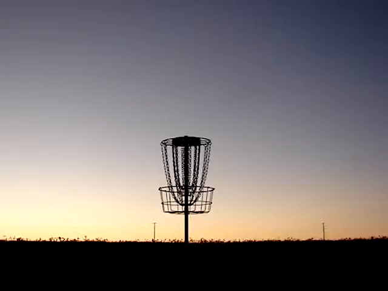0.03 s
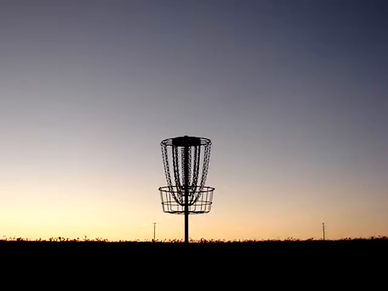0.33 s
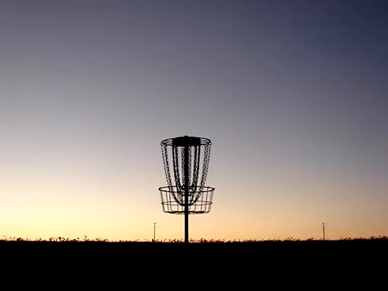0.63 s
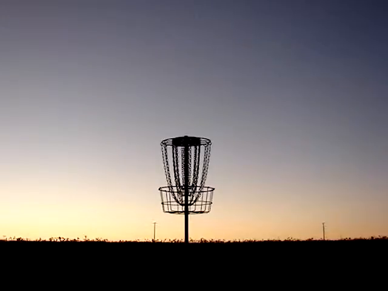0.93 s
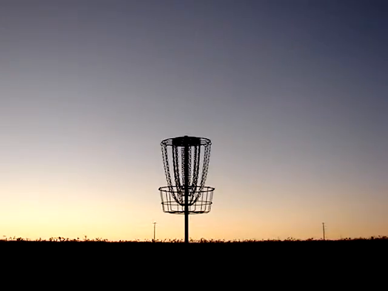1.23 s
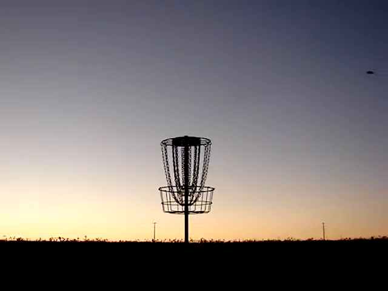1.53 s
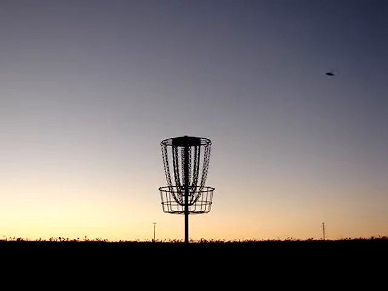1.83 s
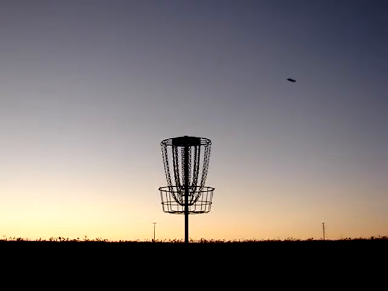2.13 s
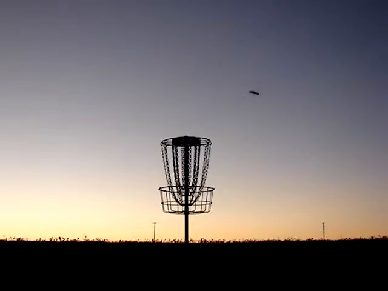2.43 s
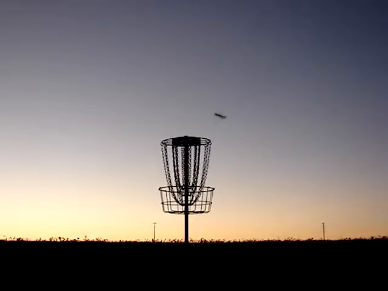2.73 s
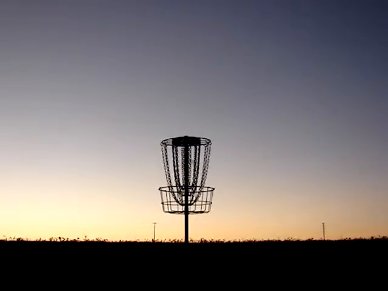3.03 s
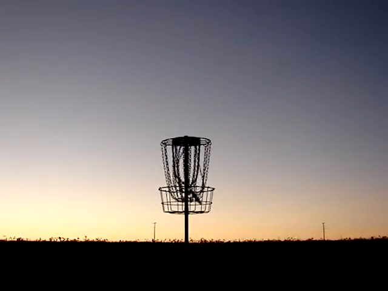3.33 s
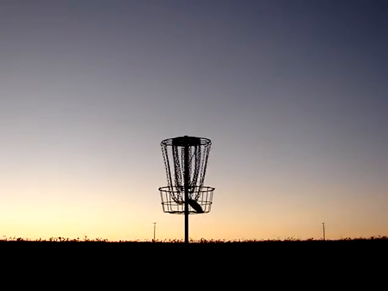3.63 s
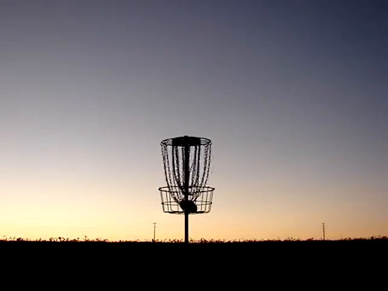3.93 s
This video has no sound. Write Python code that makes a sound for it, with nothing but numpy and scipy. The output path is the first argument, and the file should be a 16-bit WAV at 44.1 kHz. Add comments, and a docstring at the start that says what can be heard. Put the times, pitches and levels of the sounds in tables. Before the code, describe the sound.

Metal chains clash and jingle near the microphone when a flying disc cracks into them and knocks down into a wire basket. Before the hit, the open field is quiet, with distant traffic, soft scuffs and two faint peeps.

```python
"""Far traffic hums over an open field at dusk, with a hiss of air, soft scuffs and two bird peeps.
Then a plastic disc cracks against the hanging chains of a steel basket. The impact excites the modes
of disc, pole and wire tray; the links collide in bursts and ring in their bending modes while the disc
drops into the tray. A limiter ducks the background at the hit."""
import sys
import numpy as np
from scipy import signal
from scipy.fft import rfft, irfft
from scipy.io import wavfile
from scipy.ndimage import uniform_filter1d, minimum_filter1d

SR = 44100
rng = np.random.default_rng(int(sys.argv[2]) if len(sys.argv) > 2 else 0)


def bounce(signal):
    """Save signal as a 16-bit WAV file at the path given by the first command-line argument."""
    frames = np.transpose(np.atleast_2d(signal))
    limited = np.clip(frames, -1, 1)
    pcm = np.round(limited * 32767).astype(np.int16)
    wavfile.write(sys.argv[1], SR, pcm)


N = 176400
TIME = np.arange(N) / SR

# contacts of the disc: start_s, plastic_db, tray_db
DISC_CONTACTS = [(3.2051, 3, -49), (3.2099, 2, -47), (3.2124, 6, -53), (3.2179, -1.5, -55),
                 (3.2208, -2.5, -53), (3.2272, -20.5, -51), (3.2383, -10, -48), (3.2491, -15, -52),
                 (3.2518, -24, -50), (3.3619, -17, -43), (3.494, -23, -35.5), (3.616, -15, -37),
                 (3.659, -27, -49), (3.719, -21, -38.5), (3.737, -28, -43), (3.9085, -17.5, -41.5),
                 (3.921, -15, -51), (3.975, -16, -58)]
# bursts of colliding links: start_s, length_s, clatter_db, ring_db, shimmer_db, first_touch_db
CHAIN_CLASHES = [(3.235, 0.025, -12.5, -11.5, -10.5, 5), (3.278, .05, -27.5, -12.5, -23, -11),
                 (3.397, 0.014, -22.5, -19.5, -30, -20), (3.491, 0.029, -20.5, -21, -22.5, -18),
                 (3.505, 0.023, -21, -33, -24, -21), (3.658, 0.01, -18, -19.5, -19.5, 2),
                 (3.718, 0.036, -21, -23, -20, -6), (3.9198, 0.0089, -23, -23.5, -14.5, 7.5),
                 (3.928, 0.025, -30.5, -27.5, -35, -20), (3.972, .03, -33, -22, -33, -36)]


def from_db(db):
    """Decibels to amplitude ratio."""
    return 10 ** (np.asarray(db) / 20)


def rms_one(x):
    """Normalisation to an rms of 1."""
    return x / np.sqrt(np.mean(x ** 2) + 1e-20)


def decay(t, t60):
    """Exponential damping: 1 until t = 0, then 60 dB down every t60."""
    return np.exp(-np.log(1000) * np.maximum(t, 0) / t60)


def noise(spectrum):
    """Spectral shaping of white noise, at an rms of 1."""
    hz, db = np.transpose(spectrum)
    bins_hz = np.maximum(np.arange(N // 2 + 1) * SR / N, 1)
    gain = from_db(np.interp(np.log(bins_hz), np.log(hz), db))
    return rms_one(irfft(rfft(rng.standard_normal(N)) * gain, N))


def drift(rate_hz):
    """Random modulation of rms 1, interpolated between rate_hz points a second."""
    return rms_one(np.interp(TIME * rate_hz, np.arange(N), rng.standard_normal(N)))


def swell(start, length, skew):
    """Half-sine envelope; a skew under 1 makes it peak early."""
    return np.sin(np.pi * np.clip((TIME - start) / length, 0, 1) ** skew).clip(0)


def strike(times, levels_db):
    """Brief contacts idealised as impulses."""
    clicks = np.zeros(N)
    clicks[np.minimum(np.atleast_1d(times) * SR, N - 1).astype(int)] = from_db(levels_db)
    return clicks


def ring(clicks, hz, t60):
    """Damped resonator: a unit impulse starts a decaying sine of amplitude 1."""
    radius, angle = decay(1 / SR, t60), 2 * np.pi * hz / SR
    return signal.lfilter([0, np.sin(angle)], [1, -2 * radius * np.cos(angle), radius ** 2], clicks + 1e-18)


def dense_ring(clicks, spectrum, t60):
    """High modal overlap: the impulse response is decaying noise of unit energy."""
    response = (noise(spectrum) * decay(TIME, t60))[:SR // 4]
    return signal.oaconvolve(clicks, response / np.linalg.norm(response))[:N]


def struck_modes(times, levels_db, modes):
    """Modal superposition: each blow excites every mode with a random phase and a scattered level."""
    out = 0
    for hz, mode_db, t60 in modes:
        onsets = times + rng.random(len(times)) / hz
        clicks = strike(onsets, levels_db + mode_db + rng.normal(0, 1.3, len(times)))
        out += ring(clicks, hz, t60)
    return out


def traffic():
    """Incoherent addition: far vehicles merge into a dull noise of slowly varying level."""
    # loudness contour: time_s, level_db
    contour = [(0, -50), (1.0, -50.5), (1.5, -49.5), (2.0, -52.5), (2.6, -52.5), (3.2, -53.5), (4, -48.5)]
    # traffic hum: frequency_hz, density_db
    spectrum = [(25, -24.5), (80, -7), (200, -8.5), (380, -4), (580, -7.5), (720, -0.5), (900, 2),
                (1300, -7), (2400, -19), (4000, -34.5)]
    level_db = np.interp(TIME, *np.transpose(contour)) + 0.2 * drift(9.4)
    return from_db(level_db) * noise(spectrum)


def air():
    """Stationary broadband noise: the even hiss of open air."""
    # hiss: frequency_hz, density_db
    spectrum = [(100, -4), (1000, -0.5), (1900, 2.5), (2350, 1), (2700, -6.5), (3100, -6), (3550, 0),
                (3850, -7), (4500, -8.5), (7300, -11), (10000, -16.5)]
    return from_db(-54) * noise(spectrum)


def scuffs():
    """Friction noise in soft swells, roughened by amplitude modulation."""
    # scuffs: start_s, length_s, level_db
    strokes = [(0.122, 0.18, -48), (1.153, .16, -51), (2.738, 0.16, -51)]
    # rubbing noise: frequency_hz, density_db
    spectrum = [(200, 1.5), (900, -3.5), (1800, -1.5), (2800, -1), (4200, -6), (5200, -11.5), (7200, -11),
                (9500, -28.5)]
    envelope = sum(from_db(db) * swell(start, length, skew=.7) for start, length, db in strokes)
    return envelope * noise(spectrum) * from_db(0.97 * drift(120))


def bird():
    """Frequency and amplitude modulation of a pure tone: thin peeps scoop up to pitch and waver."""
    # calls: start_s, length_s, level_db
    peeps = [(1.123, 0.22, -56), (2.631, 0.18, -53.5)]
    pitch_hz, scoop_hz, scoop_s, waver_hz = 4090, 244.3, 0.0484, 75.6
    out = 0
    for start, length, db in peeps:
        scoop = scoop_hz * np.exp(-np.maximum(TIME - start, 0) / scoop_s)
        hz = pitch_hz - scoop + waver_hz * drift(250)
        envelope = from_db(db + 3.1 * drift(70)) * swell(start, length, skew=0.84) ** .5
        out += envelope * np.sin(2 * np.pi * np.cumsum(hz) / SR)
    return out


def disc_impacts():
    """Impulse excitation: each contact gives a band-limited crack and a short, dense plastic ring."""
    # struck plastic: frequency_hz, density_db
    spectrum = [(100, -16), (550, -16.5), (1100, -8), (1700, 4), (3600, 6), (5000, 3), (6500, -4),
                (8700, -7), (9400, -25), (10500, -21)]
    times, levels_db, _ = np.transpose(DISC_CONTACTS)
    crack_band = signal.butter(2, [1090, 4100], "band", fs=SR, output="sos")
    crack = signal.sosfilt(crack_band, strike(times, levels_db))
    slap = sum(dense_ring(strike(t, db), spectrum, t60=0.063) for t, db in zip(times, levels_db))
    return from_db(13.5) * crack + from_db(9.5) * slap


def pole_shudder():
    """Free vibration: the first blow leaves the pole shuddering at low frequencies."""
    # jolted pole: frequency_hz, density_db
    spectrum = [(20, 5.5), (45, -0.5), (75, 3.5), (120, -7.5), (170, -10), (300, -19), (700, -30)]
    start, db, _ = DISC_CONTACTS[0]
    return from_db(1) * dense_ring(strike(start, db), spectrum, t60=.36)


def disc_tones():
    """Heavy damping: the disc's distinct modes die soon after each contact."""
    # plastic disc: pitch_hz, level_db, t60_s
    modes = [(270, -36.5, 0.058), (1326, -27, 0.09), (1657, -22.5, 0.044), (1836, -34, 0.071),
             (2550, -26, 0.079), (2620, -33, 0.15), (3070, -26, 0.077), (3540, -36, 0.082),
             (4470, -36, .07), (5310, -32, .08), (6060, -36, .08)]
    times, plastic_db, _ = np.transpose(DISC_CONTACTS)
    return struck_modes(times, plastic_db, modes)


def wire_tray():
    """Light damping: each contact of the disc shakes the steel tray, whose modes ring on."""
    # wire tray: pitch_hz, level_db, t60_s
    modes = [(255, -19.5, 1), (280, -24, .6), (420, -18.5, 0.78), (880, -21, 0.44), (1365, -11.5, 0.42),
             (1994, -7, 0.66), (2120, -4, 0.26), (2146, -5.5, 0.9), (2227, -6, .2)]
    times, _, tray_db = np.transpose(DISC_CONTACTS)
    return struck_modes(times, tray_db, modes)


def agitation(levels_db):
    """How hard the links meet: each clash holds, drops and settles, and the clashes add in power."""
    settle_db, settle_t60_s = -7.5, 0.41
    power = 0
    for (start, length, *_), db in zip(CHAIN_CLASHES, levels_db):
        after = TIME - start - length
        envelope = np.where(after < 0, 1, from_db(settle_db) * decay(after, settle_t60_s))
        power += (from_db(db) * (TIME >= start) * envelope) ** 2
    return np.sqrt(power)


def link_tones(modes, levels_db):
    """Energy balance: modes gain energy in each clash and lose it to damping; jostling shifts their phase."""
    spread_db, phase_kick_rad = 1.5, 0.0287
    out, jostle = 0, agitation(np.zeros(len(CHAIN_CLASHES)))
    for hz, mode_db, t60 in modes:
        feed = 0
        for (start, length, *_), db in zip(CHAIN_CLASHES, levels_db):
            during = (TIME >= start) & (TIME < start + length)
            feed += from_db(db + mode_db + rng.normal(0, spread_db)) ** 2 * during / (length * SR)
        energy = signal.lfilter([1], [1, -decay(2 / SR, t60)], feed)
        phase = np.cumsum(phase_kick_rad * jostle * rng.standard_normal(N))
        out += np.sqrt(energy) * np.sin(2 * np.pi * (hz * TIME + rng.random()) + phase)
    return out


def chains(links=60, tick_groups=10, touches_per_s=1000, spread_db=5):
    """Collisions as a Poisson process: each touch ticks and rings one link, beside the clear bending tones."""
    # clearest first and second bending modes of the links: pitch_hz, level_db, t60_s
    first_bending = [(3309, -3.5, .75), (3349, 2, .65), (3443, -8, .4), (3619, -14, .6), (3902, -9, .5),
                     (4371, -18, .3), (4770, -22, .3)]
    second_bending = [(9431, -2, .25), (9536, -5, .25), (9658, -10, .2), (9844, -13, .2)]
    # tick of link against link: frequency_hz, density_db
    tick_spectrum = [(150, -30.5), (600, -34), (1300, -7.5), (2200, 1.5), (2700, -1.5), (3200, 8.5),
                     (4000, 15), (4800, 3), (6300, -11), (7300, -2), (8500, -3), (10000, -8)]
    # ring, clatter and shimmer modes of the other links: centre_hz, scatter_hz, t60_s, level_db
    link_modes = [(3210, 300, 0.54, -14.5), (4990, 1200, 0.082, -6.5), (9427, 247, 0.099, -5.5)]
    tick_t60_s = 0.039
    starts, _, clatter_db, ring_db, shimmer_db, first_touch_db = np.transpose(CHAIN_CLASHES)
    sizes = from_db(spread_db * np.clip(rng.standard_normal(N), -2, 2)) * rng.choice([-1, 1], N)
    touches = rms_one(sizes * (rng.random(N) < touches_per_s / SR))
    struck_link = rng.integers(0, links, N)
    clatter = agitation(clatter_db)
    out = link_tones(first_bending, ring_db) + link_tones(second_bending, shimmer_db)
    out += dense_ring(strike(starts, first_touch_db), tick_spectrum, tick_t60_s)
    for group in range(tick_groups):
        ticks = touches * clatter * (struck_link % tick_groups == group)
        out += from_db(-4) * dense_ring(ticks, tick_spectrum, tick_t60_s)
    forces = agitation(ring_db), clatter, agitation(shimmer_db)
    for force, (hz, scatter_hz, t60, db) in zip(forces, link_modes):
        unit_energy_gain = np.sqrt(2 * (1 - decay(2 / SR, t60)))
        blows = touches * force * from_db(db) * unit_energy_gain
        for link, offset in enumerate(rng.standard_normal(links)):
            out += ring(blows * (struck_link == link), hz + offset * scatter_hz, t60)
    return out


def singing_link():
    """Single-mode resonance: a squarely struck link swells and sings until its neighbours damp it."""
    start_s, pitch_hz, rise_s, hold_s = 3.249, 3351, .036, .024
    t = TIME - start_s
    envelope = np.clip(t / rise_s, 0, 1) * decay(t - rise_s - hold_s, t60=.16)
    return from_db(0.5) * envelope * np.sin(2 * np.pi * pitch_hz * t)


def scene():
    """Superposition of all sources at one point near the basket."""
    background = traffic() + scuffs() + air() + bird()
    impacts = disc_impacts() + pole_shudder() + disc_tones() + wire_tray()
    return (background + impacts + chains() + singing_link())[None]


def record(dry):
    """Peak limiting: gain drops at the hit and recovers slowly; clipping and a low-pass follow."""
    silence_s, fade_s, cutoff_hz = 0.0787, 0.0045, 10050
    ceiling_db, max_duck_db, release_db_per_s = -7.5, 12, 1
    x = dry[0] * np.clip((TIME - silence_s) / fade_s, 0, 1)
    over_db = np.clip(20 * np.log10(np.abs(x) + 1e-9) - ceiling_db, 0, max_duck_db)
    release_db = release_db_per_s * TIME
    held_db = np.maximum.accumulate(over_db + release_db) - release_db
    gain_db = uniform_filter1d(minimum_filter1d(-held_db, size=65), size=65)  # smooth look-ahead
    ceiling = from_db(ceiling_db)
    limited = np.clip(x * from_db(gain_db), -ceiling, ceiling)
    low_pass = signal.ellip(12, .2, 70, cutoff_hz, fs=SR, output="sos")
    return signal.sosfilt(low_pass, limited)[None]


dry = scene()
out = record(dry)
bounce(out)
```